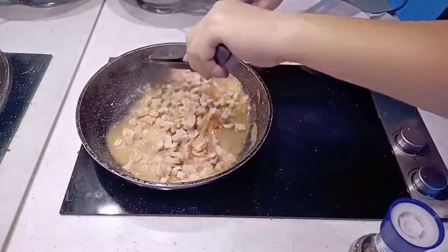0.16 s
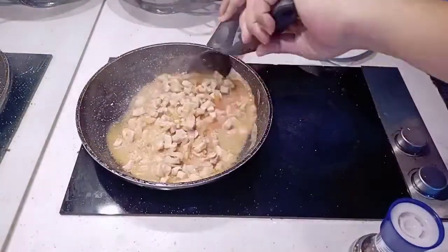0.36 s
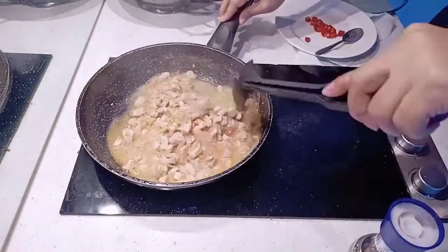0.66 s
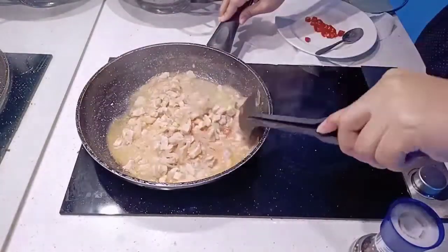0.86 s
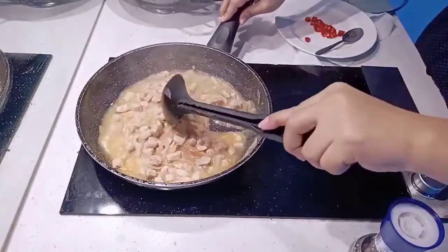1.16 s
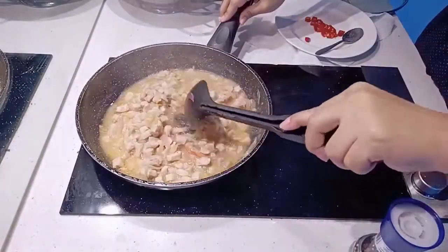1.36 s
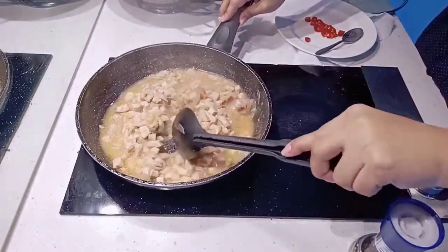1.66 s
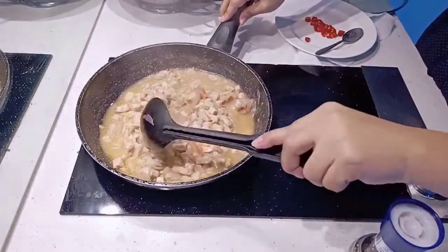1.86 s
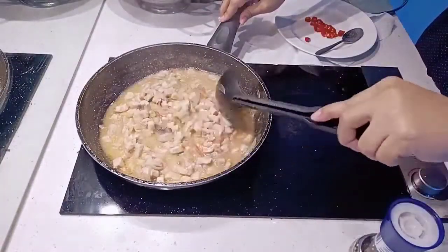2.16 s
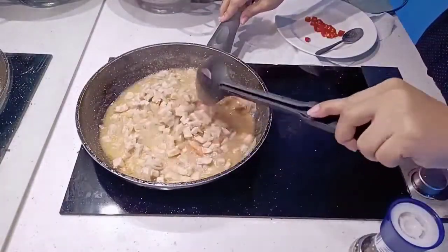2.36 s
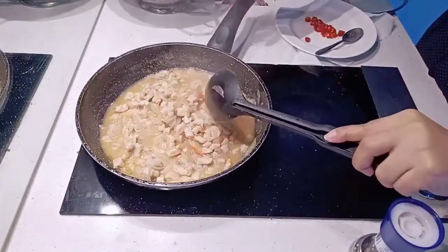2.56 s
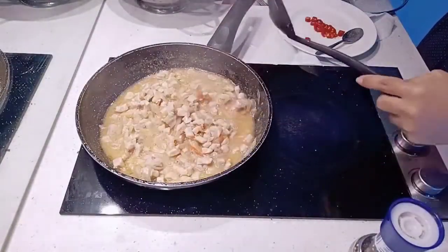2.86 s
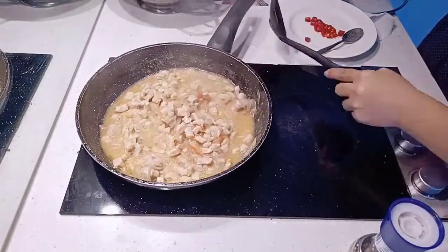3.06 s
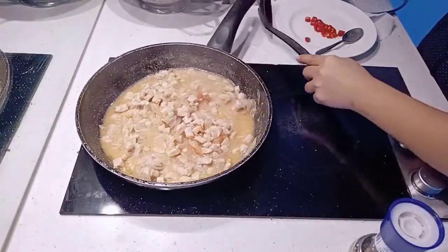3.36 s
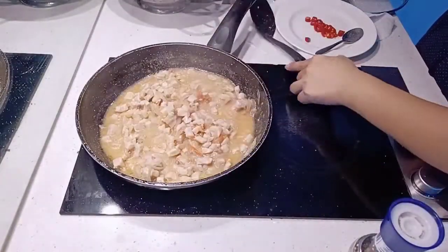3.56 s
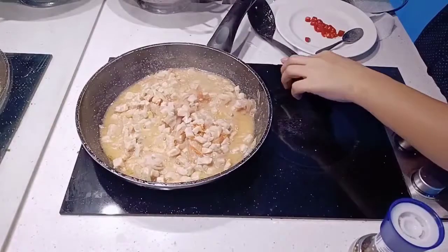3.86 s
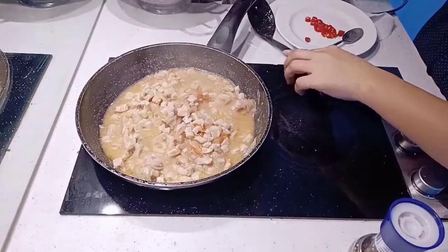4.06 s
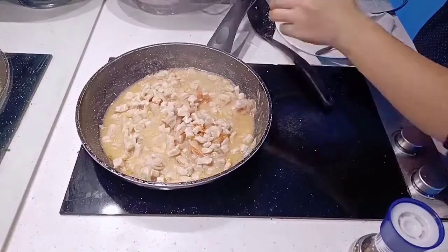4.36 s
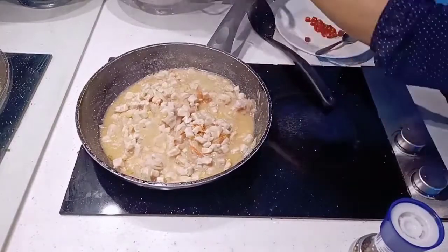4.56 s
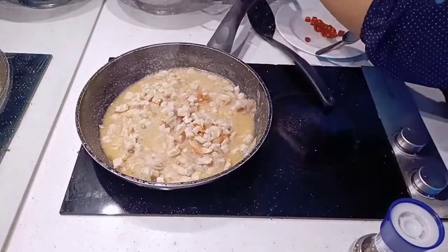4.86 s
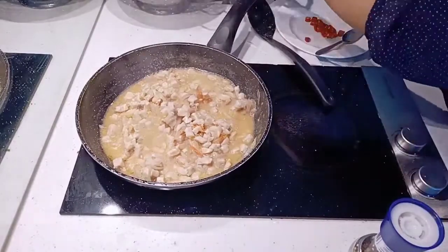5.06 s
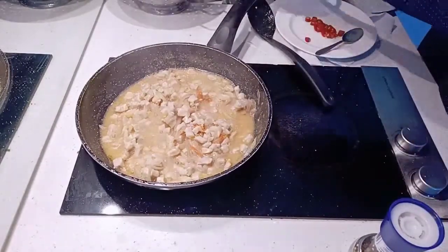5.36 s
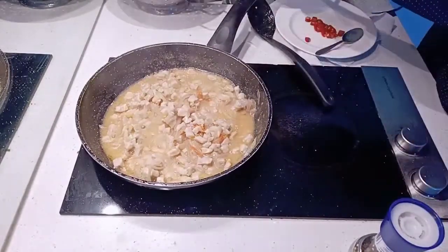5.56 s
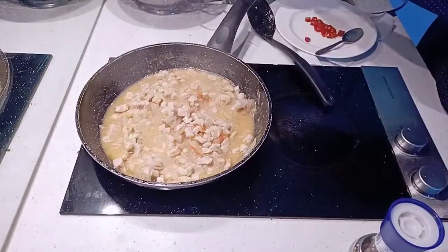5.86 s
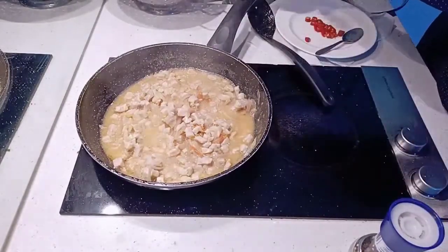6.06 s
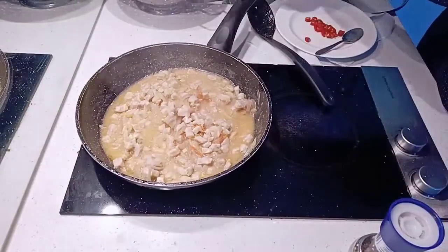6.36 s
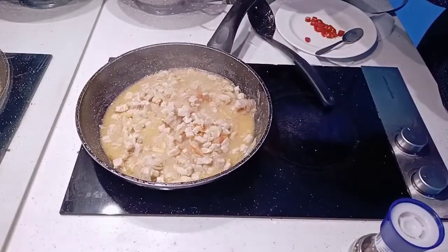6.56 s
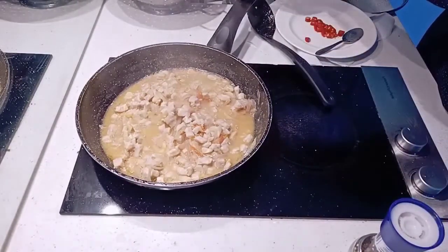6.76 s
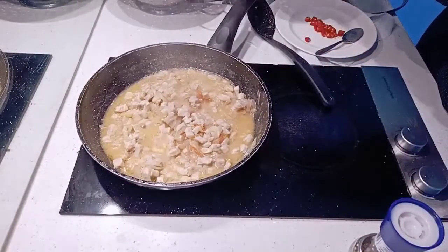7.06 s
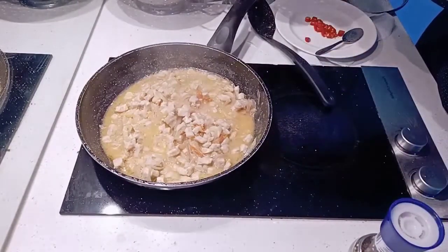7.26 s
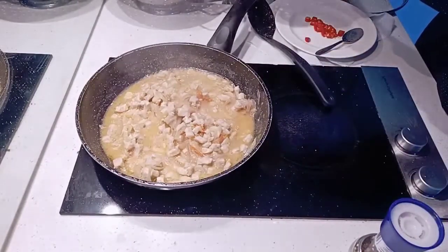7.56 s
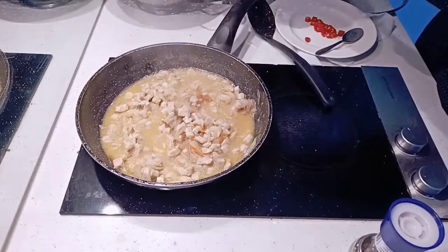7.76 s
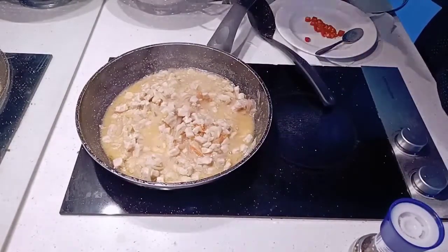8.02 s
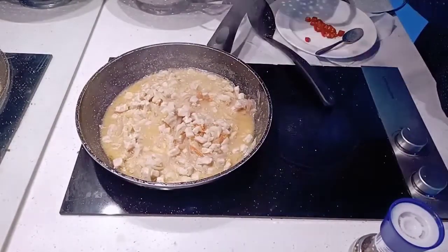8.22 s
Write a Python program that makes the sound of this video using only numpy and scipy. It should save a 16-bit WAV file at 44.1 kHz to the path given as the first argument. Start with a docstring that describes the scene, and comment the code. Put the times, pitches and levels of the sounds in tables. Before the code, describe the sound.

Saucy meat simmers faintly in a frying pan while a plastic spatula stirs and knocks; utensils clatter on the worktop, then a dish lands ringing.

```python
"""First a faint sizzle and a wet stirring stroke: pork simmers in a frying pan in a small kitchen, close by.
A plastic spatula stirs and knocks the pan, something light snaps on the worktop, utensils clatter, a dish lands.
Sizzle and bubbles are random clicks and short gliding tones; blows are contact noise exciting decaying modes.
Every blow also thumps the worktop; air and hum lie behind. The two microphone ports ring near 6 kHz."""
import sys
import numpy as np
from scipy import signal
from scipy.fft import rfft, irfft
from scipy.io import wavfile
from scipy.ndimage import uniform_filter1d

SR = 44100
rng = np.random.default_rng(int(sys.argv[2]) if len(sys.argv) > 2 else 0)


def write(x):
    x = np.atleast_2d(x).T
    wavfile.write(sys.argv[1], SR, np.round(np.clip(x, -1, 1) * 32767).astype(np.int16))


N = 369990
TIME = np.arange(N) / SR

# Sauce runs over hot metal and sizzles up: t/s, length/s, rise/dB
FLARE_UPS = [(3.065, 0.12, 3), (4.822, 0.054, 2), (6.93, 0.36, 1)]
FLARE_ATTACK_S, FLARE_RELEASE_S = 0.02, 0.028
# The sizzle grows as the sauce heats up, and flares while a stroke bares the hot pan
SIZZLE_START_DB, HEATING_DB_PER_S, STROKE_FLARE_DB = -56, 0.3816, 1


def simmer(count=4):
    """Several spots round the pan, each with its own path to the microphones."""
    spots = 0
    for _ in range(count):
        path = kitchen(lag_s=.00012, direct_db=-5.0, near_db=-1.5, tail_db=-8.0, near_t60=0.029)
        spots = spots + through(sizzle_spot(), path)
    flare_db = STROKE_FLARE_DB * effort()
    for s, length_s, db in FLARE_UPS:
        flare_db = flare_db + db * push(s, length_s, FLARE_ATTACK_S, FLARE_RELEASE_S)
    flicker_db = 0.31 * walk(22)
    heating_db = HEATING_DB_PER_S * TIME
    return spots / np.sqrt(count) * undb(SIZZLE_START_DB + heating_db + flare_db + flicker_db)


# Spectrum of the sizzle: f/Hz, level/dB per Hz
SIZZLE_COLOUR = [(200, -13.5), (700, 3), (1100, -10), (1350, 0.5), (1600, -5), (1900, -1), (3400, 0),
                 (4600, -0.5), (5900, -6.5), (7200, -3), (15000, 4.5)]


def sizzle_spot():
    """Steam bursts at one spot of the sauce: tiny bubbles, duller blisters, broad sputters and thin high spits."""
    tiny = undb(-2.33) * pops(rate=9000, spread_db=4.5)
    larger = undb(-23) * pops(rate=160, spread_db=5.0, cap=2.8)
    bursts = pops(rate=70, spread_db=3.6, cap=3.6)
    blisters = level(cut(cut(bursts, 730, "high"), 4900, "low"), -12.0)
    sputters = undb(-7) * spurts(rate=11, spread_db=5.5, decay_s=0.0048)
    spits = spurts(rate=20, spread_db=1.5, decay_s=0.0019)
    # steep cuts from both sides leave a narrow band
    spits = cut(cut(spits, 5950, "high", order=10), 5950, "low", order=10)
    return colour(tiny + larger + blisters + sputters + level(spits, -8.0), SIZZLE_COLOUR)


def spurts(rate, spread_db, decay_s):
    """Short puffs of steam at random moments, rms 1."""
    t = np.arange(2048) / SR
    puffs = through(np.abs(pops(rate, spread_db, cap=2.2)), np.exp(-t / decay_s))[0]
    return level(puffs * rng.standard_normal(N), 0)


# The loudest bubbles and spits, before the room: t/s, level/dB, starting f/Hz, cycles until it falls to 1/e
BURSTS = [(.602, -31, 1900, 6), (3.108, -29, 5200, 0.6), (3.304, -30, 5640, 1.4), (3.385, -32, 4850, 0.46),
          (3.669, -31, 4200, 4), (3.722, -29.5, 2800, 0.34), (4.377, -30, 5630, 0.96),
          (4.610, -33.5, 2700, 1.5), (4.699, -29, 6000, 0.58), (4.812, -35, 1200, 4.4),
          (4.867, -29, 4800, 0.53), (6.120, -30, 5460, 0.89), (6.822, -33, 1260, 7), (6.985, -29, 5200, .5),
          (7.609, -33, 5600, .5)]
BURST_GLIDE = .01  # rise in pitch while a bubble fades


def bursting():
    """Bubbles break at the surface of the sauce: a few loud ones among many faint ticks and plips."""
    out = undb(-71) * bubbles(low_hz=1880, high_hz=6600, cycles=1.16, glide=BURST_GLIDE, count=240, size=1024)
    for s, db, hz, cycles in BURSTS:
        pop = bubble(hz, cycles, BURST_GLIDE)
        out[int(s * SR):][:len(pop)] += undb(db) * pop / np.linalg.norm(pop)
    return through(out, kitchen(lag_s=.00012, direct_db=-7, near_db=-1.5, tail_db=-8.5, near_t60=0.046))


def stirring():
    """The spatula pushes meat through the sauce: dull squelches and small wet smacks."""
    squelch = bubbles(low_hz=124, high_hz=714, cycles=0.67, glide=0.054, count=1400, size=2048)
    smacks = cut(cut(pops(rate=700, spread_db=4.5, cap=6.0), 4200, "low"), 870, "high")
    return (undb(-66.0) * squelch + undb(-57.5) * smacks) * effort()


# Strokes of the spatula through the sauce: t/s, length/s, effort level/dB
STROKES = [(0.0, 0.086, -3), (0.293, 0.3, 1), (0.967, 0.34, -4.5), (1.327, 0.14, -7.5), (1.745, 0.23, -2.5),
           (2.32, 0.5, -2.5)]
STROKE_ATTACK_S, STROKE_RELEASE_S = 0.045, 0.24  # the push builds up; the sauce settles after it


def effort():
    """How hard the spatula is stirring, as a gain: all its strokes together."""
    return sum(undb(db) * push(s, length_s, STROKE_ATTACK_S, STROKE_RELEASE_S) for s, length_s, db in STROKES)


# Spatula on the pan: t/s, blow level/dB, contact corner f/Hz, slide/s, pan ring level/dB,
# worktop thump level/dB, blade click level/dB
KNOCKS = [(.223, -14, 4760, 0.0013, -19, 12.5, 0.5), (.254, -27, 900, .002, -19, 4, -30),
          (.845, -10.5, 3400, 0.0041, -6, 10.5, -4), (.897, -18.5, 2700, 0.0041, -12, 10, -16),
          (.951, -25, 4900, .0039, -28, -2, -10), (1.693, -20.5, 5000, 0.0062, -19, 0.5, -19),
          (2.005, -24, 4000, .0061, -39, 1, -11.5), (2.304, -8, 3800, 0.0012, -4.5, 8, -1),
          (2.358, -21, 3000, 0.054, -18, -2, -20), (2.7865, -12.5, 2800, 0.0011, 12, 13, -8),
          (2.860, -20.5, 3500, 0.0052, -28, -6, -18), (3.103, -29, 5300, 0.015, -35, 0, -22),
          (3.410, -22, 7000, 0.0056, -40, -11, -12.5), (3.462, -16.5, 9000, 0.018, -28, -0.5, -14)]
# Modes of the pan: f/Hz, level at the resonance/dB, t60/s
PAN_MODES = [(207, -0.5, 0.081), (294, -2, 0.12), (594, -4.5, 0.026), (796, -5, 0.016), (894, -1.5, 0.026),
             (1075, -5, 0.024), (1310, -19, .09), (2540, -12.5, 0.0096)]
# Modes of the plastic blade's own click: f/Hz, level at the resonance/dB, t60/s
BLADE_MODES = [(1650, -8, 0.039), (1900, -6.5, 0.019), (2780, -5.5, 0.0091), (3340, -1.5, .025),
               (3680, -2, 0.0086), (5620, -6, 0.029)]


def spatula_knocks():
    """Blows of the spatula make the pan ring and its own blade click."""
    return struck(KNOCKS, PAN_MODES) + through(taps(KNOCKS, column=6), ring(BLADE_MODES))


# The spatula judders along the pan wall: its slips start quick and slow to a steady rate
DRAG_S, DRAG_LENGTH_S, DRAG_DB = .745, 0.051, -54.5
DRAG_ATTACK_S, DRAG_RELEASE_S = 0.017, 0.042
DRAG_START_HZ, DRAG_STEADY_HZ, DRAG_SLOWING_S = 235, 166, .012


def drag():
    """Stick and slip of the spatula: an uneven low buzz."""
    slowing = np.exp(-np.maximum(TIME - DRAG_S, 0) / DRAG_SLOWING_S)
    hz = DRAG_STEADY_HZ + (DRAG_START_HZ - DRAG_STEADY_HZ) * slowing
    phase = np.cumsum(hz * (1 + 0.082 * walk(200))) / SR
    buzz = level(cut(phase % 1 - .5, 360, "low"), DRAG_DB)
    return buzz * push(DRAG_S, DRAG_LENGTH_S, DRAG_ATTACK_S, DRAG_RELEASE_S)


# Something hard and light snaps against the worktop: t/s, blow level/dB, contact corner f/Hz, slide/s,
# ring level/dB, worktop thump level/dB
SNAP = [(5.149, 1, 3900, 0.0011, 6.5, 8)]
# Modes of the snapping object: f/Hz, level at the resonance/dB, t60/s
SNAP_MODES = [(261, 3.5, 0.097), (357, -7.5, 0.14), (714, -7, 0.05), (960, -13, .025), (1460, -12, 0.036),
              (1615, -8, 0.037), (2530, -16, 0.022), (3240, -6, 0.013), (3860, -0.5, 0.024),
              (4200, -2.5, 0.022)]


def snapping():
    """One hard, light object hits the worktop and rings briefly."""
    return struck(SNAP, SNAP_MODES)


# Utensils on the worktop: t/s, blow level/dB, contact corner f/Hz, slide/s, hollow ring level/dB,
# worktop thump level/dB, chink level/dB
CLATTER = [(5.427, -6, 700, 0.011, -16, 6, -26), (5.436, -25, 8000, 0.0049, -22, -10, -16),
           (5.4669, 3.5, 8900, 0.0025, 12, 13, 6), (5.469, -1.5, 14000, 0.0018, -12, 17, 16),
           (5.475, 0, 12000, 0.0017, -5, 13, 10), (5.481, 4, 9300, 0.0038, 11.5, 18, 2),
           (5.486, 0.5, 10000, 0.018, 1, 5, 13), (5.498, -6, 10000, .002, 3.5, 5, 4),
           (5.517, 1, 15100, 0.0023, 0, 20.5, 2), (5.526, -9, 15000, 0.0016, -2, 8, -4),
           (5.571, 0.5, 8800, 0.0029, 7, 18, 10), (5.590, -15, 12000, 0.0018, -11, 2, -4),
           (5.599, -9, 7000, 0.0013, -7, 0, -14), (5.612, -20, 9000, 0.0017, -3, 0, -11),
           (5.620, -19, 7960, 0.0022, -4, -3, -3), (5.630, -15, 6000, 0.0016, -2, 13.5, -19),
           (6.334, -24, 8870, 0.02, -28, -3.5, -34), (6.743, -23, 12000, .006, -27, -12, -14),
           (6.805, -23.5, 4970, .0035, -23, -22, -30)]
# Modes of the hollow ring: f/Hz, level at the resonance/dB, t60/s
HOLLOW_MODES = [(245, 2, .12), (528, -5.5, 0.047), (760, -9, 0.047), (1040, -0.5, 0.048),
                (1280, -22, 0.065), (1700, -6, .091), (2600, -1, 0.093), (3800, -1, 0.1), (4070, -1, .12)]
# Modes of the bright chink of utensil on utensil: f/Hz, level at the resonance/dB, t60/s
CHINK_MODES = [(4170, -2.5, 0.033), (5250, -3, .016), (5780, -4.5, 0.029), (6850, -0.5, 0.013)]


def utensil_clatter():
    """Utensils slide, fall with hollow rings and bright chinks, and rattle as they settle."""
    blows = struck(CLATTER, HOLLOW_MODES)
    chinks = through(taps(CLATTER, column=6), ring(CHINK_MODES))
    return blows + chinks + rattle(CLATTER) + scrape()


# After each blow the utensils rattle against each other as they settle
RATTLE_DB, RATTLE_RISE_S, RATTLE_DECAY_S = -11.5, 0.028, 0.023
RATTLE_LOW_HZ, RATTLE_HIGH_HZ = 600, 9100


def rattle(rows):
    """A flurry of tiny touches that swells and dies after each blow."""
    t = np.arange(SR) / SR
    flurry = ((1 - np.exp(-t / RATTLE_RISE_S)) * np.exp(-t / RATTLE_DECAY_S)) ** 2
    power = np.abs(through(taps(rows, column=1) ** 2, flurry / flurry.sum()))
    touches = cut(pops(rate=2100, spread_db=3.5, cap=4.2), RATTLE_LOW_HZ, "high")
    touches = cut(touches, RATTLE_HIGH_HZ, "low")
    return undb(RATTLE_DB) * touches * np.sqrt(power)


# A utensil slides just before the clatter
SCRAPE_S, SCRAPE_LENGTH_S, SCRAPE_DB = 5.378, 0.037, -52
SCRAPE_ATTACK_S, SCRAPE_RELEASE_S = 0.0091, .015
# Resonances of its rasp: f/Hz, level at the resonance/dB, t60/s
SCRAPE_MODES = [(620, -3, 0.014), (930, -2, .02), (3230, -2.5, 0.0044), (6900, -11, .002)]


def scrape():
    """A utensil slides before it falls: quick slips set it rasping."""
    rasp = through(pops(rate=1800, spread_db=-1, cap=2.4), ring(SCRAPE_MODES))
    return level(rasp, SCRAPE_DB) * push(SCRAPE_S, SCRAPE_LENGTH_S, SCRAPE_ATTACK_S, SCRAPE_RELEASE_S)


# A dish set down, edge first: t/s, blow level/dB, contact corner f/Hz, slide/s, dish ring level/dB,
# worktop thump level/dB, edge chink level/dB
DISH = [(7.504, -15.5, 15000, .0046, -25, 14, 3.5), (7.516, -10.5, 9300, 0.011, -24, -12, -13),
        (7.5323, -10, 3900, 0.0041, 12.5, 9, -17), (7.544, -9.5, 6500, .0064, -9, 16.5, -17),
        (7.567, -19, 9000, .002, -8, 4, -24)]
# Modes of the dish: f/Hz, level at the resonance/dB, t60/s
DISH_MODES = [(931.6, 0, 1.7), (1124, -8, 0.23), (1280, -18, .14), (1631, -8, 0.13), (1762, -2, 0.4),
              (1820, 5.5, 0.46), (1950, -18, .03), (2097, 5.5, 0.47), (2270, -7.5, 0.039),
              (2420, -11, 0.036), (2740, -5.5, 0.062), (3050, -1, 0.17), (3290, -10, .08), (3402, -6, 0.43),
              (3690, -3.5, 0.6)]
# Modes of its edge: f/Hz, level at the resonance/dB, t60/s
EDGE_MODES = [(5490, 4.5, 0.026), (6780, 4, 0.054), (7957, -3, 0.037)]


def dish_set_down():
    """The edge of the dish chinks and its body rings on."""
    return struck(DISH, DISH_MODES) + through(taps(DISH, column=6), ring(EDGE_MODES))


# Modes of the worktop: f/Hz, level at the resonance/dB, t60/s
WORKTOP_MODES = [(58, -10, 0.29), (104.9, 4.5, 0.37), (125.3, -1, 0.38), (142, -10.5, 0.21),
                 (170.4, -5, 0.26), (199.8, -5, 0.68), (257, -12, 0.37), (337.5, -13.5, 0.096)]


def worktop_thumps():
    """Every blow sets the worktop swinging in its low modes."""
    blows = sum(taps(rows, column=5) for rows in (KNOCKS, SNAP, CLATTER, DISH))
    return cut(cut(through(blows, ring(WORKTOP_MODES)), 400, "low"), 36, "high")


def arm_rumble():
    """The stirring arm moves: a faint deep rumble while it stirs."""
    rumble = cut(cut(rng.standard_normal(N), 77, "low"), 38, "high")
    return level(rumble, -70.5) * effort()


# Spectrum of the air in the room: f/Hz, level/dB per Hz (relative)
AIR = [(20, 3), (32, -9.5), (60, -2.5), (80, -10.5), (102, -4), (123, -12.5), (156, -8.5), (200, -11),
       (350, -13), (440, -22), (530, -8.5), (620, -22.5), (760, -16), (1200, -29), (2400, -80)]
AIR_DB = -62
# Hum of the appliances, around which it wavers: f/Hz, level/dB
HUM = [(101.5, -70), (145.3, -76.5)]


def room_tone():
    """Low rush of air and a hum that wavers in pitch and level."""
    hum = 0
    for hz, db in HUM:
        gain = undb(db + 2.0 * walk(6.0)) * np.sqrt(2)
        turns = np.cumsum(hz + 2.274 * walk(9.5)) / SR
        hum = hum + gain * np.sin(2 * np.pi * turns)
    noise = diffuse(N, alike_hz=640) + 0.18 * rng.standard_normal((2, N))
    return level(colour(noise, AIR), AIR_DB) * undb(0.2 * walk(2.2)) + hum


def bubble(hz, cycles, glide, size=4096):
    """One pocket of air: it rings for a few cycles, rising in pitch."""
    turns = hz * np.arange(size) / SR
    age = turns / cycles
    return np.exp(-age) * np.sin(2 * np.pi * turns * (1 + glide * age))


def bubbles(low_hz, high_hz, cycles, glide, count=260, size=4096):
    """Bubbles at random moments, rms 1; the small, high ones are weaker."""
    out = np.zeros(N + size)
    for when, pitch, strength in rng.random((count, 3)):
        hz = low_hz * (high_hz / low_hz) ** pitch
        gain = undb(12.6 * strength - 9 * pitch)
        out[int(when * N):][:size] += gain * bubble(hz, cycles, glide, size)
    return level(out[:N], 0)


def pops(rate, spread_db, cap=4.8):
    """Random clicks, rate per second, of exponentially spread dB up to a cap; rms 1."""
    sizes = undb(spread_db * np.minimum(rng.exponential(size=N), cap))
    return level((rng.random(N) < rate / SR) * sizes * rng.choice([-1, 1], N), 0)


def push(start_s, length_s, attack_s, release_s):
    """Envelope of one push: it builds up, holds and dies away."""
    age = TIME - start_s
    return np.clip(age / attack_s, 0, 1) * np.exp(-np.maximum(age - length_s, 0) / release_s)


def struck(rows, modes):
    """Contact noise plus the ring of the body."""
    return cut(contacts(rows), 520, "high", order=1) + through(taps(rows, column=4), ring(modes))


def contacts(rows, first_share=0.48, size=8192):
    """Each blow is a first touch and a slide of tiny slips that swells and dies; a softer contact is duller."""
    out, t = np.zeros(N + size), np.arange(size) / SR
    for s, db, corner_hz, slide_s, *_ in rows:
        pressure = (1 - np.exp(-t / (0.34 * slide_s))) * np.exp(-t / (1.05 * slide_s))
        force = rng.standard_normal(size) * (rng.random(size) < .3) * pressure
        force /= np.linalg.norm(force) + 1e-9
        # the shorter the slide, the more of the blow is in the first touch
        force[0] += first_share * 0.0018 / slide_s
        force /= np.linalg.norm(force)
        out[int(s * SR):][:size] += undb(db) * cut(force, corner_hz, "low", order=3)
    return out[:N]


def taps(rows, column):
    """One impulse for each row, as strong as the dB in that column."""
    out, rows = np.zeros(N), np.array(rows)
    np.add.at(out, (rows[:, 0] * SR).astype(int), undb(rows[:, column]))
    return out


def ring(modes):
    """Impulse response of a body: neighbouring modes swing in opposite directions."""
    t = np.arange(SR) / SR
    out = np.zeros(SR)
    for k, (hz, db, t60) in enumerate(modes):
        decay = np.log(1000) / t60
        peak = 2 * decay / SR  # makes the gain at the resonance equal to db
        out += (-1) ** k * undb(db) * peak * np.exp(-decay * t) * np.sin(2 * np.pi * hz * t)
    return out


def kitchen(lag_s, direct_db, near_db, tail_db, near_t60=0.07, tail_t60=0.36, dull_hz=7500, low_hz=220):
    """Direct sound reaching the left port late, quick reflections from worktop and cupboards, then the room."""
    t = np.arange(int(.6 * SR)) / SR
    near = diffuse(len(t)) * undb(-60 * t / near_t60) * (t > .0006)
    tail = cut(diffuse(len(t)), dull_hz, "low", order=1)
    tail = tail * undb(-60 * t / tail_t60) * np.minimum(t / .012, 1)
    response = 0
    for part, db in ((near, near_db), (tail, tail_db)):
        response = response + undb(db) * part / np.sqrt(np.sum(part ** 2) / 2)
    response[0, int(lag_s * SR)] += undb(direct_db)
    response[1, 0] += undb(direct_db)
    gain = np.sqrt(np.sum(response ** 2) / 2)
    return cut(balance(response, width=132) * gain, low_hz, "high")


def balance(response, width):
    """Even out a response over bands of this width in Hz, so that it keeps only its fine ripple."""
    power = np.mean(np.abs(rfft(response)) ** 2, axis=0)
    power = uniform_filter1d(power, int(width * response.shape[1] / SR))
    hz = np.fft.rfftfreq(response.shape[1], 1 / SR)
    return colour(response, np.transpose([hz, -10 * np.log10(power)])[1:])


def diffuse(size, alike_hz=650):
    """Noise from all around: the bass is alike at both ports, the treble is not."""
    mid, side = rng.standard_normal((2, size))
    side = cut(side, alike_hz, "high", order=1)
    return np.array([mid + side, mid - side])


def to_right(x, db):
    """The right port hears it louder by this many dB."""
    return x * undb(np.array([[-db], [db]]) / 2)


def undb(db):
    """Decibels to gain."""
    return 10 ** (np.asarray(db) / 20)


def level(x, db):
    """Scale to an rms level."""
    return x * undb(db) / np.sqrt(np.mean(x ** 2))


def walk(rate):
    """Slow chance with a spread near 1, drawn anew rate times a second."""
    k = max(int(SR / rate), 1)
    steps = np.repeat(rng.standard_normal(N // k + 1), k)
    return 1.195 * uniform_filter1d(steps, k)[:N]


def through(x, response):
    """Pass a sound through an impulse response."""
    return signal.fftconvolve(np.atleast_2d(x), np.atleast_2d(response), axes=-1)[:, :N]


def colour(x, points, size=8192):
    """Causal filter with the given (Hz, dB) spectrum."""
    hz, db = np.transpose(points)
    grid = np.maximum(np.fft.rfftfreq(size, 1 / SR), 1)
    cepstrum = irfft(np.log(undb(np.interp(np.log(grid), np.log(hz), db))))
    # folding the cepstrum onto positive times gives minimum phase
    cepstrum[1:size // 2] *= 2
    cepstrum[size // 2 + 1:] = 0
    return through(x, irfft(np.exp(rfft(cepstrum))))


def cut(x, hz, kind, order=2):
    """Low-pass or high-pass."""
    return signal.sosfilt(signal.butter(order, min(hz, .45 * SR), kind, fs=SR, output="sos"), x)


def scene():
    """Pan and dish a little to the right, utensils further, the snap furthest, all on one worktop."""
    pan_path = kitchen(lag_s=.0001, direct_db=1, near_db=-3, tail_db=-10, near_t60=.05, low_hz=144)
    snap_path = kitchen(lag_s=.00027, direct_db=3, near_db=-0.5, tail_db=-9.5, near_t60=.047, dull_hz=4500)
    utensil_path = kitchen(lag_s=.00018, direct_db=-2, near_db=0.5, tail_db=-6.5, near_t60=.035, tail_t60=.47)
    dish_path = kitchen(lag_s=.0001, direct_db=2, near_db=-3, tail_db=-8, near_t60=.05)
    pan = through(spatula_knocks() + stirring(), pan_path)
    snap = through(snapping(), snap_path)
    utensils = through(utensil_clatter(), utensil_path)
    dish = through(dish_set_down(), dish_path)
    low_sounds = worktop_thumps() + drag() + arm_rumble()
    sauce = to_right(simmer() + bursting(), db=1.5)
    return sauce + to_right(pan + snap + utensils + dish + low_sounds + room_tone(), db=1.16)


# Response of the microphone ports: f/Hz, level/dB
MICROPHONE = [(20, 1), (4000, 2.5), (4900, 1.5), (5400, 7), (5850, 10.5), (6400, 4.5), (7200, 0),
              (8500, -3.5), (11500, -9), (14000, -7), (15500, -11.5)]
TOP_HZ = 15550


def record(dry):
    """The microphone ports colour the treble, and the top is cut."""
    top_cut = signal.ellip(10, .2, 70, TOP_HZ, fs=SR, output="sos")
    return signal.sosfilt(top_cut, colour(dry, MICROPHONE))


dry = scene()
out = record(dry)
write(out)
```